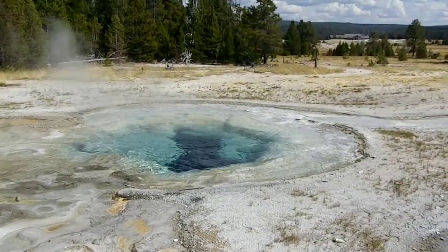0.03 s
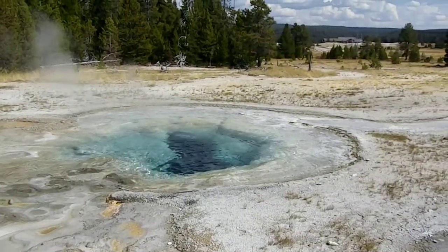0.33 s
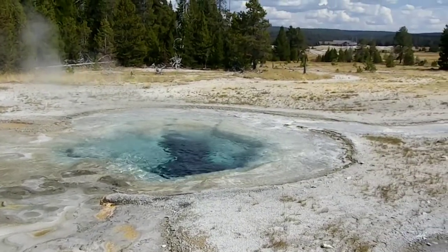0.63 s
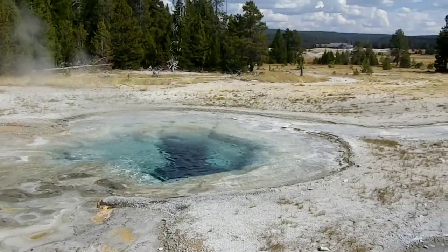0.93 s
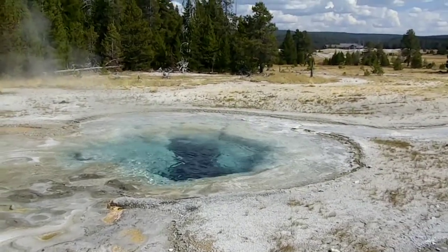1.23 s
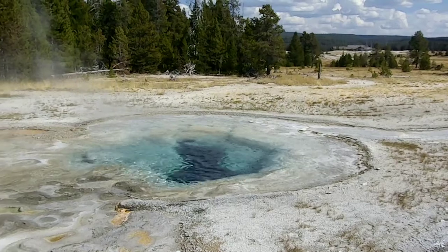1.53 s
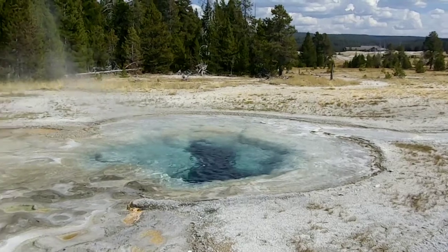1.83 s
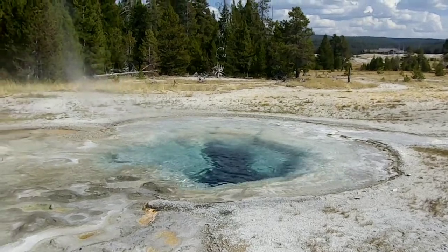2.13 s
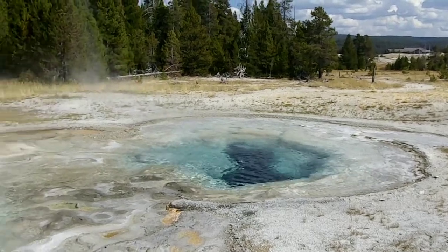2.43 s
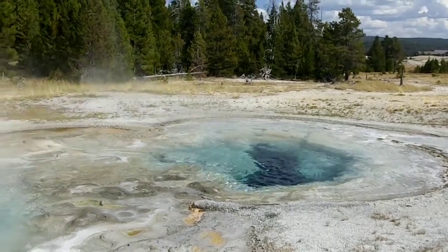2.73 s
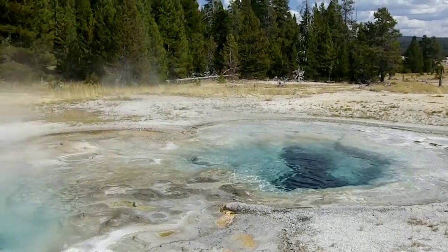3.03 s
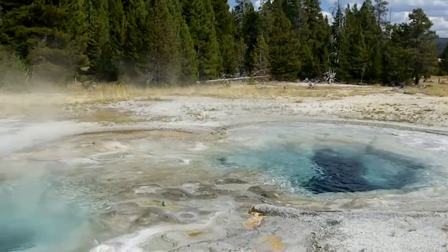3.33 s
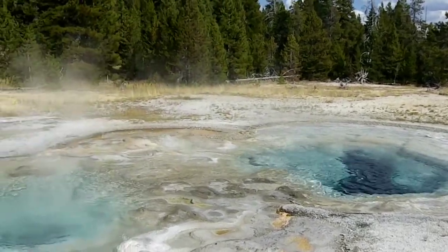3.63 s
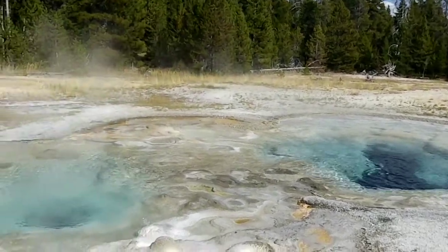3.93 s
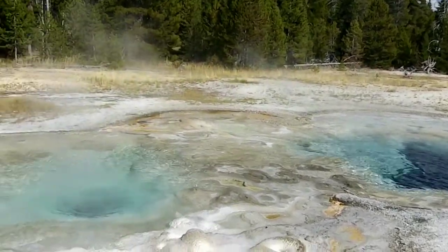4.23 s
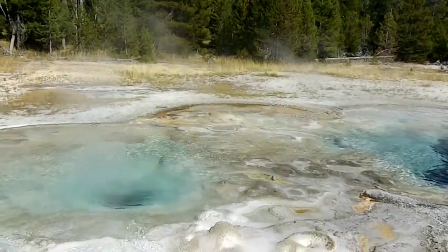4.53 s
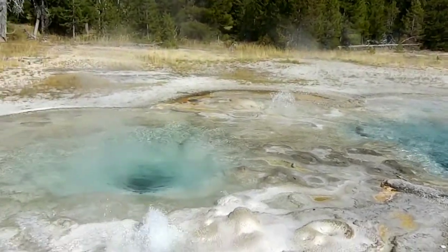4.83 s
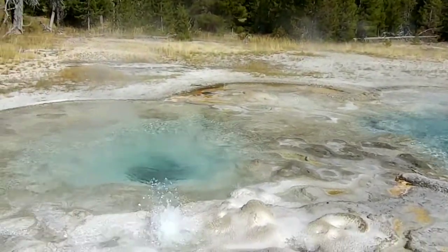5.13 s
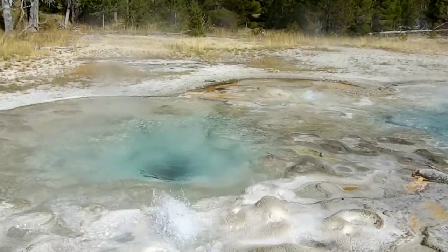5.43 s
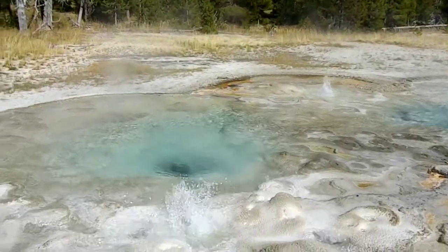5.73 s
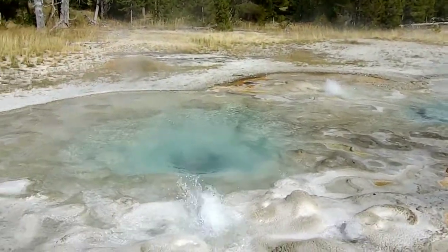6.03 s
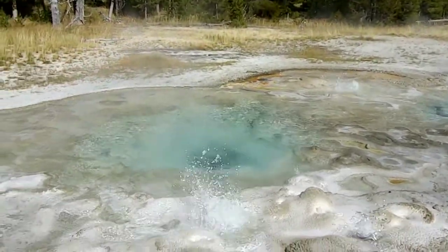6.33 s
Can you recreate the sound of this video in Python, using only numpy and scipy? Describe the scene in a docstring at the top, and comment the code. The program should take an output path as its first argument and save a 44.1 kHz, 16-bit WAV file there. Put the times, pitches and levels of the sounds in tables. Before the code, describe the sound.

Gusts of wind buffet the microphone while a hot spring bubbles, surges and splashes in the open air.

```python
"""A hot spring simmers to the left in the open air: a dense churn of short bubbles under a hiss of
falling spray. Almost at once gusts and hard eddies buffet the microphone, and the gusts keep coming.
From 0.6 s the vent surges again and again and the odd drop ticks on the crust; big bubbles join at
1.5 s. From 2.3 s the listener turns from a still pool to face the vent, so the water moves to the
middle. Thrown water slaps down from 2.7 s, most often near the end."""
import sys
import numpy as np
from scipy import signal
from scipy.io import wavfile

SR = 44100
rng = np.random.default_rng(int(sys.argv[2]) if len(sys.argv) > 2 else 0)


def persist_wave(psi):
    """Save psi, clipped to +-1, as 16-bit WAV."""
    counts = np.round(np.clip(psi, -1, 1) * 32767).astype(np.int16)
    wavfile.write(sys.argv[1], SR, np.atleast_2d(counts).T)


N = 280917


def from_db(db):
    """Decibels to gain."""
    return np.exp(np.asarray(db) * (np.log(10) / 20))


def rms_one(x):
    """Scale to unit power."""
    return x / np.sqrt(np.mean(x ** 2) + 1e-20)


def power_sum(levels_db):
    """Level in dB of unrelated sounds heard together."""
    return 10 * np.log10(sum(from_db(np.maximum(level, -120)) ** 2 for level in levels_db))


def at_hz(points, hz, column=1):
    """One column of a spectrum table, interpolated over log frequency."""
    table = np.array(points)
    return np.interp(np.log(np.maximum(hz, 1)), np.log(table[:, 0]), table[:, column])


def drift(rate_hz):
    """Slow random wander, rms 1."""
    step = 40
    pole = np.exp(-2 * np.pi * rate_hz * step / SR)
    noise = rng.standard_normal(N // step + 2002)
    slow = signal.lfilter([1], [1, -2 * pole, pole * pole], noise)[2000:]
    return np.interp(np.arange(N) / step, np.arange(len(slow)), rms_one(slow))


def band(x, low_hz, high_hz, order=2):
    """Causal band-pass."""
    sos = signal.butter(order, [low_hz, min(high_hz, .45 * SR)], "band", fs=SR, output="sos")
    return signal.sosfilt(sos, x + 1e-18)


def add(track, start_s, sound):
    """Mix a short sound into a track."""
    start = max(int(start_s * SR), 0)
    track[start:start + len(sound)] += sound[:N - start]


def envelope_db(start_s, hold_s, rise_db_per_s, slope_db_per_s, fall_db_per_s):
    """Attack up to start_s, sloping hold, release; 0 dB at the top."""
    t = np.arange(N) / SR - start_s
    hold = slope_db_per_s * np.clip(t, 0, hold_s) - max(slope_db_per_s * hold_s, 0)
    return hold - rise_db_per_s * np.maximum(-t, 0) - fall_db_per_s * np.maximum(t - hold_s, 0)


def grains(per_s, spread_db=1.5):
    """Random clicks, many small and a few large; rms 1."""
    at = np.flatnonzero(rng.random(N) < per_s / SR)
    sizes = rng.standard_exponential(N)[at]
    signs = rng.integers(0, 2, N)[at] * 2 - 1
    clicks = np.zeros(N)
    clicks[at] = signs * from_db(spread_db * np.minimum(sizes, 4.5))
    return rms_one(clicks)


def spray_share(hz):
    """Crossover from churn (0) to spray (1) over the octave above 2900 Hz."""
    return np.clip(np.log2(hz / 2900), 0, 1)


# Surges of the vent. Each row: start in seconds, hold in seconds, churn and spray levels in dB.
VENT_SURGES = [(0.58, 0.25, -44.5, -45.5), (0.901, 0.17, -38.5, -42.5), (1.185, 0.22, -39.5, -45),
               (1.466, 0.14, -39, -44.5), (1.8, 0.32, -45, -51), (2.302, 0.35, -41.5, -49.5),
               (2.713, 0.45, -34.5, -44), (3.26, 0.12, -33, -43), (3.486, 0.11, -38, -49),
               (3.665, 0.11, -34, -43), (4.452, 0.072, -41, -52), (4.67, 0.2, -39.5, -47),
               (4.98, 0.26, -46, -51.5), (5.21, 0.21, -40.5, -46.5), (5.423, 0.13, -36, -42.5),
               (5.626, 0.23, -34.2, -40), (5.93, 0.12, -32.5, -38), (6.12, 0.22, -34.3, -39.8)]


def boil(simmer_churn_db, simmer_spray_db):
    """Churn and spray levels in dB: each surge wells up, swells and collapses back to a simmer."""
    churn, spray = [simmer_churn_db], [simmer_spray_db]
    for start_s, hold_s, churn_db, spray_db in VENT_SURGES:
        shape_db = envelope_db(start_s, hold_s, rise_db_per_s=104, slope_db_per_s=1, fall_db_per_s=137)
        churn.append(churn_db + shape_db)
        spray.append(spray_db + shape_db)
    return power_sum(churn), power_sum(spray)


def water(churn_db, spray_db, per_s_at_1khz, wash_db, splat_db, flicker_db, slosh_db):
    """Bubbles burst in classes of size over a smooth wash; splats excite all classes at once."""
    common = from_db(splat_db) * grains(per_s=1100) + from_db(wash_db) * rng.standard_normal(N)
    sway_db = slosh_db * drift(rate_hz=12.7)
    out, edges_hz = np.zeros(N), np.geomspace(110, 18000, 11)
    for k, (low, high) in enumerate(zip(edges_hz, edges_hz[1:])):
        hz = np.sqrt(low * high)
        fine = spray_share(hz)
        bursts = grains(per_s=per_s_at_1khz * (hz / 1000) ** .9)
        ringing = rms_one(band(bursts + common * (-1) ** k, low, high))
        wander_db = (1 - 0.23 * fine) * (sway_db + flicker_db * drift(rate_hz=45))  # spray is steadier
        level_db = (1 - fine) * churn_db + fine * spray_db + wander_db
        out += ringing * np.sqrt((high - low) / 2200) * from_db(level_db)
    return out


def lone_bubbles(per_s, decay_cycles):
    """Single bubbles ring briefly and rise in pitch; rms 1."""
    out, t = np.zeros(N), np.arange(SR // 25) / SR
    for when, pitch, strength in rng.random((int(per_s * N / SR), 3)):
        hz = 650 * 2 ** (2.4 * pitch)
        age = t * hz / decay_cycles
        ring = np.exp(-age) * np.sin(2 * np.pi * hz * t * (1 + age / 20))
        add(out, when * N / SR, strength ** 2 * ring)
    return rms_one(out)


def pop(t, hz):
    """A collapsing cavity: one swing of pressure, down then up, of height 1."""
    phase = 2 * np.pi * hz * t
    return phase * np.exp(.5 * (1 - phase * phase))


def droplets(per_s, low_hz, high_hz):
    """Falling water lands in lone pops of uneven size and pitch."""
    out, t = np.zeros(N), np.arange(-SR // 500, SR // 500) / SR
    for when, pitch, strength in rng.random((int(per_s * N / SR), 3)):
        add(out, when * N / SR, strength ** 2 * pop(t, low_hz * (high_hz / low_hz) ** pitch))
    return out


# Gusts on the microphone. Each row: start in seconds, hold in seconds, level in dB.
WIND_GUSTS = [(0.107, 0.2, -16), (0.74, 0.2, -24.5), (0.974, 0.44, -15.5), (1.509, 0.15, -19),
              (1.755, 0.09, -16), (1.863, 0.068, -15), (2.115, 0.5, -19), (2.743, 0.18, -19),
              (3.271, 0.038, -20), (3.465, 0.17, -19), (3.73, 0.13, -13), (4.1, 0.12, -25.5),
              (4.45, .35, -20), (4.896, 0.094, -14), (5.918, 0.021, -19.5), (6.054, 0.078, -25.5)]


def gusts(breeze_db, wander_db):
    """Wind level in dB: each gust builds quickly, sags and dies away into a wandering breeze."""
    levels_db = [
        db + envelope_db(start_s, hold_s, rise_db_per_s=389, slope_db_per_s=-11.5, fall_db_per_s=234)
        for start_s, hold_s, db in WIND_GUSTS]
    return power_sum(levels_db + [breeze_db + wander_db * drift(rate_hz=5.4)])


# Wind rumble spectrum. Each row: frequency in Hz, relative density in dB.
RUMBLE_SPECTRUM = [(25, -5), (60, 3.5), (130, 2.5), (200, -2), (300, -12.5), (430, -27.5), (700, -38),
                   (1000, -51), (1500, -84)]
# The microphone favours the difference between its ports in the bass.
# Each row: frequency in Hz, difference over common signal in dB.
BASS_WIDENING = [(30, 24), (120, 19), (250, 15), (500, -1), (1000, -6), (1500, -3)]


def wind(level_db, lump_db, band_lump_db, brighten):
    """Lumpy turbulence and hard eddies, brighter in strong gusts, mostly opposite in the two channels."""
    force_db = gusts(breeze_db=-37, wander_db=4) + lump_db * np.minimum(drift(rate_hz=66), 1.4)
    edges_hz = np.geomspace(20, 1600, 12)
    centres_hz = np.sqrt(edges_hz[1:] * edges_hz[:-1])
    shares = from_db(at_hz(RUMBLE_SPECTRUM, centres_hz)) * np.sqrt(np.diff(edges_hz))
    shares = shares / np.linalg.norm(shares)
    apart, common = eddies(push_db=-1.5, tear_db=-20.5, tear_s=0.0072, leak_db=-16.5)
    for low, high, hz, share in zip(edges_hz, edges_hz[1:], centres_hz, shares):
        # small eddies grow faster with wind speed than large ones
        tilt_db = brighten * np.clip(np.log2(hz / 110), -1.7, 1.7) * (np.minimum(force_db, -9) + 12.5)
        gain = share * from_db(level_db + force_db + tilt_db + band_lump_db * drift(rate_hz=32))
        noise = band(rng.standard_normal((2, N)), low, high, order=3)
        apart += gain * rms_one(noise[0])
        common += gain * rms_one(noise[1]) * from_db(-at_hz(BASS_WIDENING, hz))
    return np.array([common + apart * from_db(0.73), common - apart])


# Hard eddies hitting the ports. Each row: time in seconds, relative peak in dB, centre in Hz.
HARD_EDDIES = [(0.153, -2.5, 159), (0.2, -2.5, 280), (1.013, -4, 149), (1.099, 0, 156), (1.537, -1.5, 141),
               (1.617, -3, 129), (1.647, -5.5, 80), (1.806, -6, 153), (1.87, -1.5, 193), (1.92, -7, 200),
               (1.928, 0.5, 228), (2.128, 2, 226), (2.162, -5.5, 380), (2.175, -1.5, 239),
               (2.345, -4.5, 186), (2.362, -5, 155), (2.441, -5, 223), (2.845, -2, 188), (3.3, -3, 190),
               (3.462, -3, 145), (3.523, -2, 206), (3.886, -2, 131), (4.275, -2, 217), (4.595, -1.5, 149),
               (4.887, -3.5, 160), (4.897, -1, 232), (4.932, -5, 179)]


def eddies(push_db, tear_db, tear_s, leak_db):
    """A suction between two weaker pushes, ragged as it breaks up; returns difference and common parts."""
    t = np.arange(-SR // 50, SR // 50) / SR
    push, tear = np.zeros(N), np.zeros(N)
    for time_s, db, hz in HARD_EDDIES:
        u = (np.pi * hz * t) ** 2
        add(push, time_s + t[0], from_db(db + push_db) * (2 * u - 1) * np.exp(-u))
        add(tear, time_s + t[0], from_db(db + tear_db) * hz / 200 * np.exp(-np.abs(t) / tear_s))
    ragged = band(tear * rng.standard_normal((2, N)), 280, 494) * np.sqrt(SR / 800)
    return push + ragged[0], from_db(leak_db) * push + 0.38 * ragged[1]


# Drops on the crust. Each row: start in seconds, relative peak in dB.
CRUST_DROPS = [(0.621, -25), (1.587, -20), (1.903, -24), (3.086, -19), (5.681, -11)]


def crust_ticks(level_db, decay_s):
    """A drop hits the crust with a tiny bright crack."""
    out, t = np.zeros(N), np.arange(SR // 10) / SR
    for start_s, db in CRUST_DROPS:
        crack = band(rng.standard_normal(len(t)) * np.exp(-t / decay_s), low_hz=5670, high_hz=9100)
        add(out, start_s, from_db(db + level_db) * crack / np.abs(crack).max())
    return out


# Big bubbles. Each row: start in seconds, relative level in dB, starting pitch in Hz, swell in seconds.
BIG_BUBBLES = [(1.522, -15, 561, 0.0052), (2.625, -20, 441, 0.011), (2.665, -19.5, 860, 0.0061),
               (4.628, -21, 452, 0.013), (4.668, -14, 380, 0.0033), (5.066, -24, 470, 0.015),
               (5.091, -15.5, 637, 0.0058)]


def gulps(level_db, rise_per_s):
    """A big bubble swells, wobbles and rises in pitch."""
    out, t = np.zeros(N), np.arange(SR // 10) / SR
    for start_s, db, hz, swell_s in BIG_BUBBLES:
        swell = t / swell_s * np.exp(1 - t / swell_s)
        wobble = 0.15 + 0.43 * rms_one(band(rng.standard_normal(len(t)), 31, 125))
        tone = np.sin(2 * np.pi * hz * (t + .5 * rise_per_s * t * t))
        add(out, start_s, from_db(db + level_db) * swell * wobble * tone)
    return out


# Slaps of thrown water. Each row: time in seconds, relative level in dB, centre in Hz,
# patter decay in seconds.
WATER_SLAPS = [(2.701, -18.5, 1190, 0.0023), (2.762, -23, 1090, 0.009), (2.936, -15.5, 975, 0.0041),
               (3.106, -19, 1400, 0.013), (4.791, -18.5, 1400, 0.013), (5.148, -17, 1340, 0.0037),
               (5.418, -22, 950, 0.022), (5.596, -15.5, 1240, 0.0045), (5.835, -18.5, 1570, 0.02),
               (6.0227, -18, 1330, 0.0054), (6.0262, -11.5, 1180, 0.0054), (6.174, -21, 910, 0.007)]


def slaps(pop_db, patter_db):
    """Thrown water lands with a pop and a patter after it."""
    out, t = np.zeros(N), np.arange(SR // 10) / SR
    early_s = 0.001
    for time_s, db, hz, decay_s in WATER_SLAPS:
        add(out, time_s - early_s, from_db(db + pop_db) * pop(t - early_s, hz))
        patter = rms_one(band(rng.standard_normal(len(t)), hz * 0.7, hz * 1.66, order=3))
        add(out, time_s, from_db(db + patter_db) * patter * np.exp(-t / decay_s))
    return out


# The listener's turn. Each row: time in seconds, facing (0 = vent to the left, 1 = vent ahead).
LISTENER_TURN = [(0, 0.046), (2.3, 0.083), (3.1, 0.73), (4.2, 0.78), (5.3, 1), (6.37, 1)]
# Colour of the sound. Each row: frequency in Hz, relative density in dB from the side, then from the front.
WATER_COLOUR = [(149, 10, 1), (343, -4.5, -6.5), (533, 2, 4), (800, -2.5, -3.5), (980, 1.5, 3),
                (1412, -4, -3), (2030, -6.5, -2.5), (2750, -15.5, -6), (3800, -16, -14.5), (5030, -31, -15),
                (5590, -9, -11), (8920, -16, -20.5), (10280, -23, -27.5), (12800, -29, -33),
                (15500, -40, -38)]
# Stereo image of the water. Each row: frequency in Hz, left lead in radians from the side, then from
# the front, left-right likeness (0 to 1) from the side, then from the front.
WATER_IMAGE = [(600, 0, 0, .92, .94), (2000, .15, 0, .96, .99), (3000, .8, .1, .78, .97),
               (4000, 2.6, .7, .72, .72), (4800, 3.14, 2.6, .99, .7), (6000, 3.6, 3.6, .85, .35),
               (7200, 4.3, 4.9, .7, .55), (9200, 6.2, 6.1, .95, .9), (9900, 6.5, 6.3, .6, .2),
               (10400, 9, 9, .7, .8), (12000, 7.7, 7.2, .55, .3), (14500, 4.7, 4.6, .28, .2)]
# Water balance. Each row: frequency in Hz, left over right in dB from the side, then from the front.
WATER_BALANCE = [(150, 26, 4), (500, 7.5, 2), (1200, 11, 2.5), (2420, -0.5, 0.5), (4100, -4.5, -3.5),
                 (6100, 1.5, 4.5), (8500, 0, 2.5), (11000, 4.5, 2), (14500, -1, 2)]


def two_ports(direct, scattered, splashes):
    """Direct sound reaches the left port first, ground scatter blurs it; the image follows the turn."""
    hz, times_s, (near, far, sharp) = signal.stft(np.array([direct, scattered, splashes]), SR, nperseg=256)
    ahead = np.clip(np.interp(times_s, *np.transpose(LISTENER_TURN)), 0, 1)

    def turned(table, freq_hz, column=1):
        side, front = at_hz(table, freq_hz, column), at_hz(table, freq_hz, column + 1)
        return np.outer(side, 1 - ahead) + np.outer(front, ahead)

    # colour is relative to the middle of the churn and of the spray
    fine = spray_share(hz[:, None] + 1)
    middle_db = (1 - fine) * turned(WATER_COLOUR, 1393) + fine * turned(WATER_COLOUR, 6690)
    tint = from_db(turned(WATER_COLOUR, hz) - middle_db - 4.46 * fine)
    lead_rad, alike = turned(WATER_IMAGE, hz), turned(WATER_IMAGE, hz, column=3)
    bias_db = turned(WATER_BALANCE, hz)
    near, far = near * tint * np.sqrt(1 + alike), far * tint * np.sqrt(1 - alike)
    left = (near + far) * np.exp(.5j * lead_rad) / np.sqrt(1 + from_db(-2 * bias_db))
    right = (near - far) * np.exp(-.5j * lead_rad) / np.sqrt(1 + from_db(2 * bias_db))
    # thrown water lands nearer the middle, so its lead is smaller
    left += sharp * np.exp(.1j * lead_rad)
    right += sharp * np.exp(-.1j * lead_rad)
    return signal.istft(np.array([left, right]), SR)[1][:, :N]


def scene():
    """Boiling water and splashes in stereo, a faint hiss behind and the wind on top."""
    churn_db, spray_db = boil(simmer_churn_db=-44.5, simmer_spray_db=-52)
    direct = water(churn_db, spray_db, per_s_at_1khz=600,
                   wash_db=-1, splat_db=-1, flicker_db=1.76, slosh_db=1.22)
    direct += from_db(churn_db - 17) * lone_bubbles(per_s=64, decay_cycles=4.45)
    direct += from_db(churn_db + 10) * droplets(per_s=32, low_hz=905, high_hz=2180)
    direct += from_db(spray_db + 13.5) * droplets(per_s=19, low_hz=5000, high_hz=11000)
    scattered = water(churn_db, spray_db, per_s_at_1khz=1100,
                      wash_db=-29, splat_db=-13, flicker_db=2, slosh_db=3)
    splashes = slaps(pop_db=1.5, patter_db=-8.5)
    splashes += crust_ticks(level_db=-8.5, decay_s=0.0014)
    splashes += gulps(level_db=-3, rise_per_s=7.76)
    hiss = from_db(-71.5) * rms_one(band(rng.standard_normal((2, N)), 13000, 15000, order=1))
    rumble = wind(level_db=-0.1, lump_db=4.5, band_lump_db=1.5, brighten=0.33)
    return from_db(-0.73) * two_ports(direct, scattered, splashes) + hiss + rumble


def record(dry):
    """Round the highest peaks and cut the top of the treble."""
    ceiling, cutoff_hz = .95, 15400
    rounded = dry / (1 + np.abs(dry / ceiling) ** 6) ** (1 / 6)
    return signal.sosfilt(signal.ellip(10, .2, 80, cutoff_hz, fs=SR, output="sos"), rounded)


dry = scene()
out = record(dry)
persist_wave(out)
```